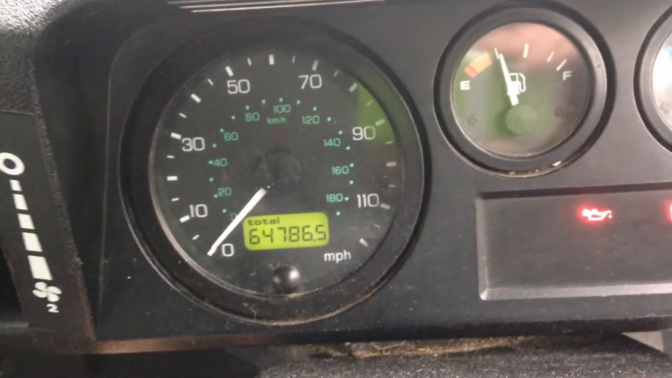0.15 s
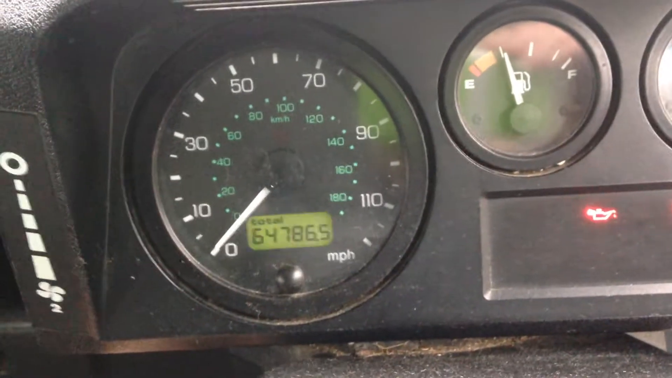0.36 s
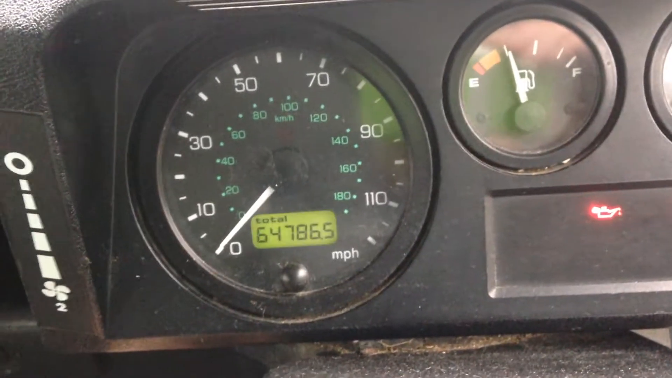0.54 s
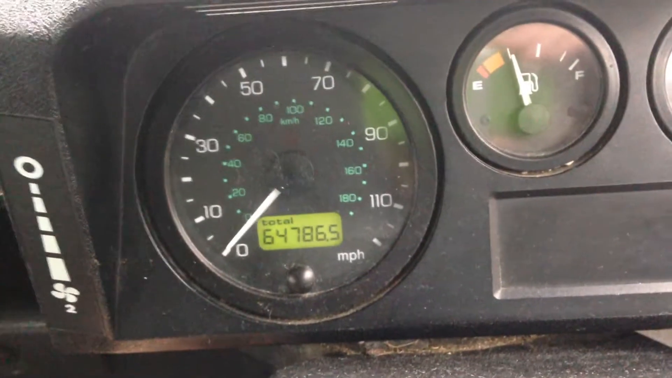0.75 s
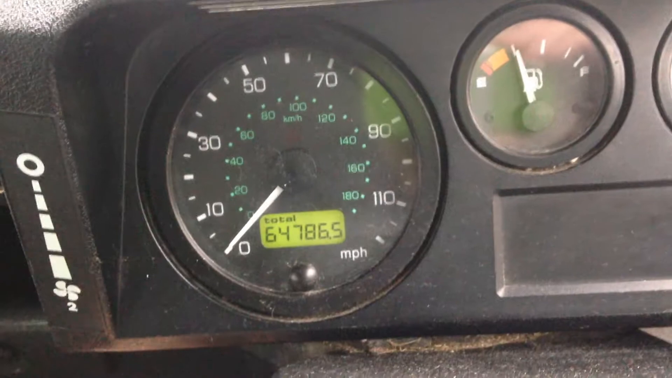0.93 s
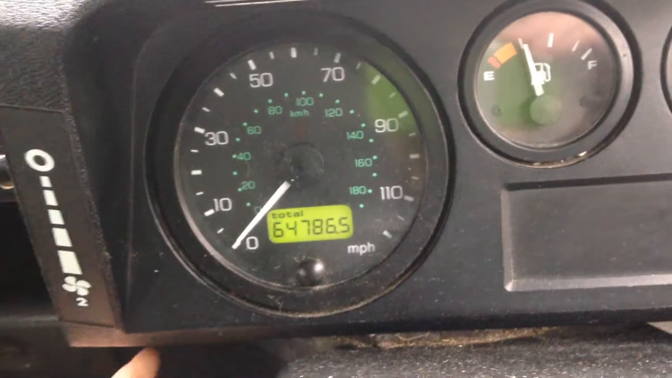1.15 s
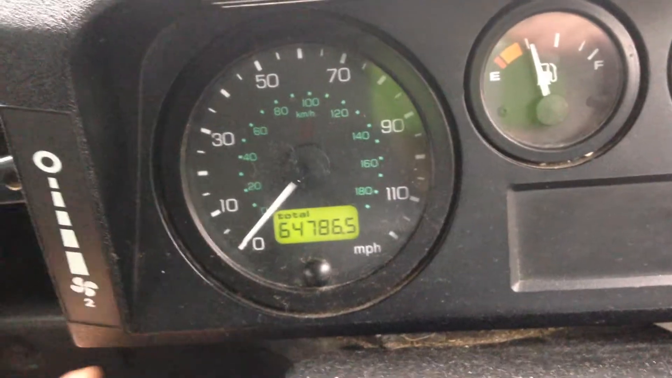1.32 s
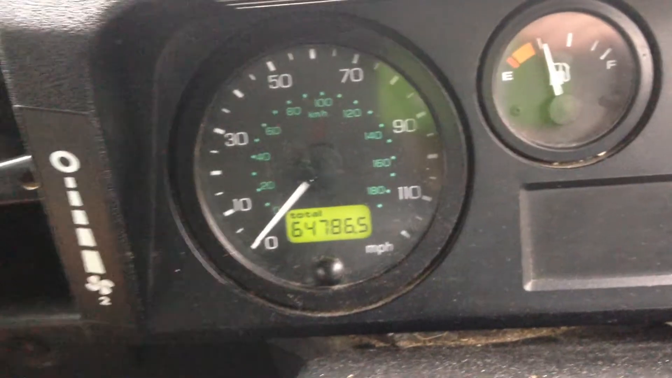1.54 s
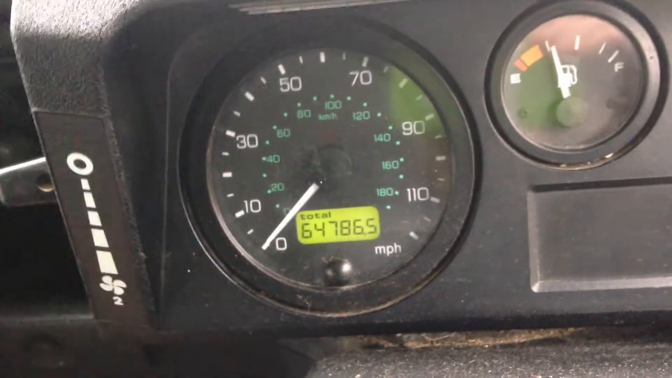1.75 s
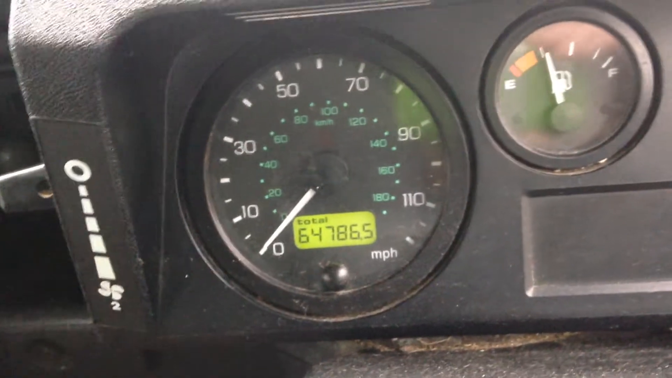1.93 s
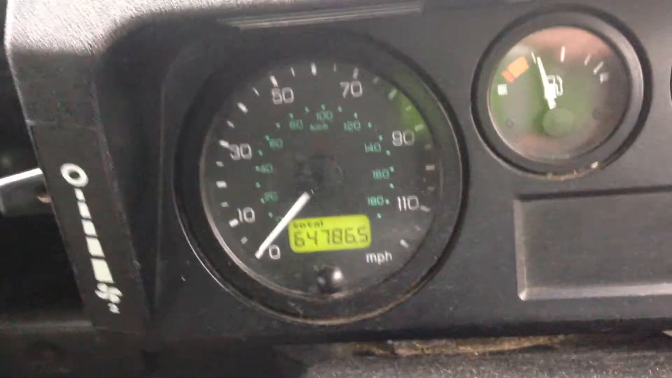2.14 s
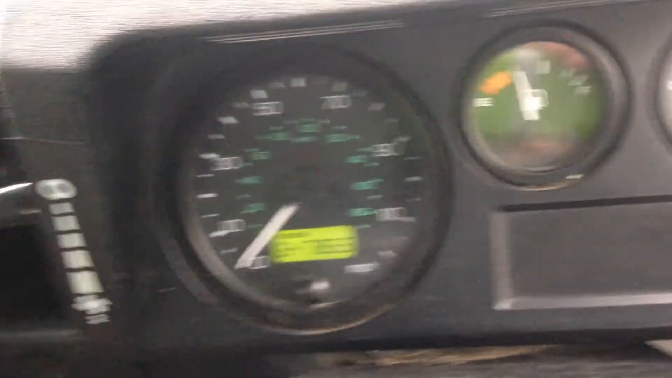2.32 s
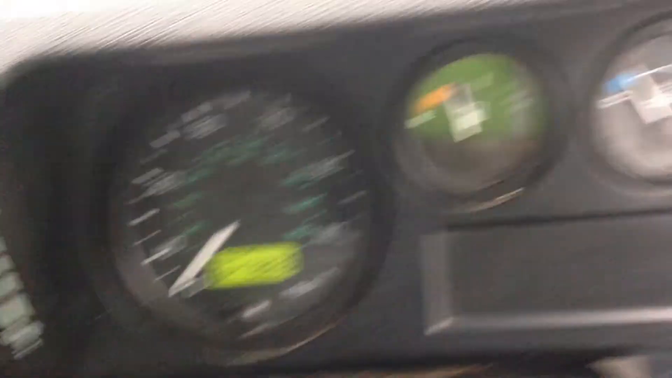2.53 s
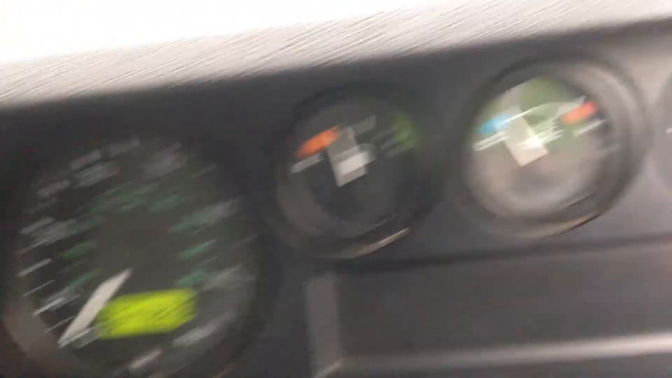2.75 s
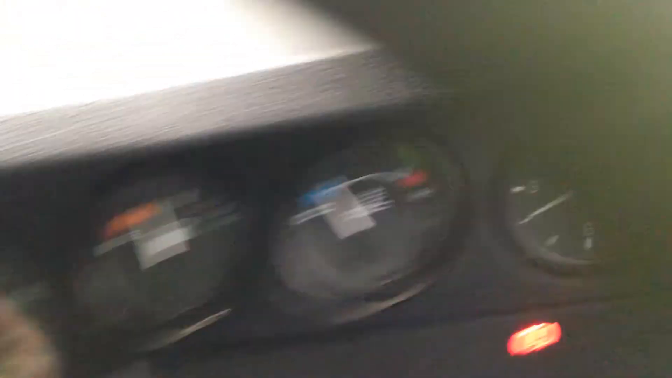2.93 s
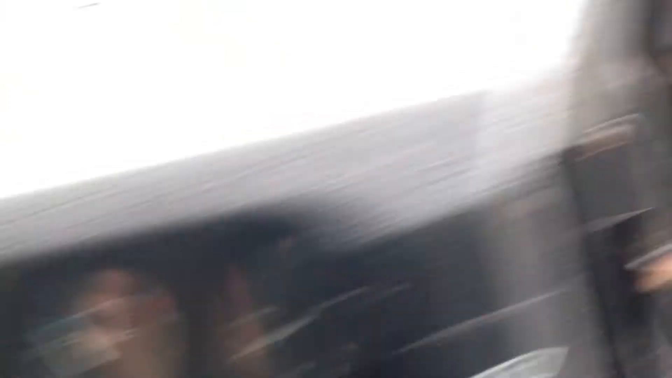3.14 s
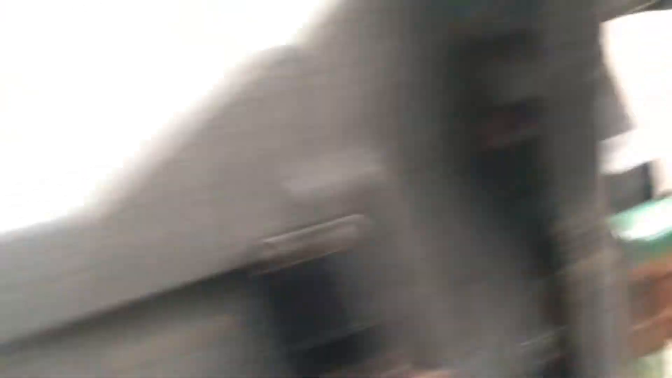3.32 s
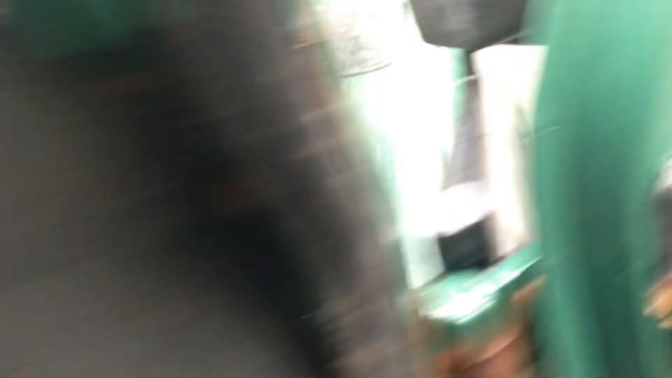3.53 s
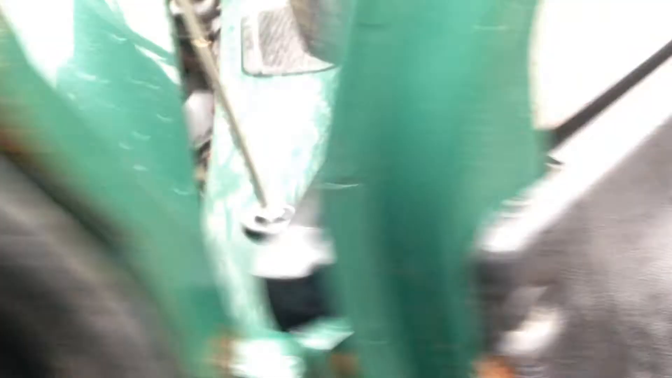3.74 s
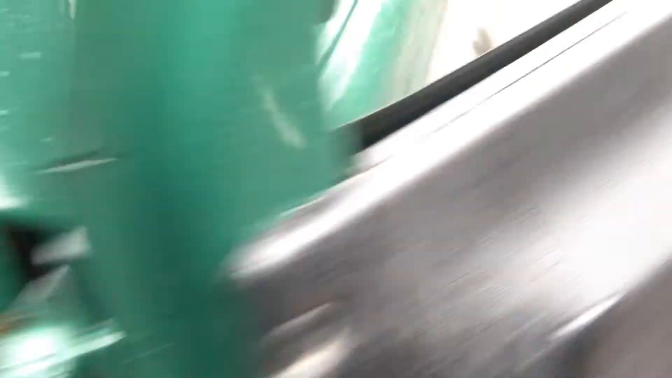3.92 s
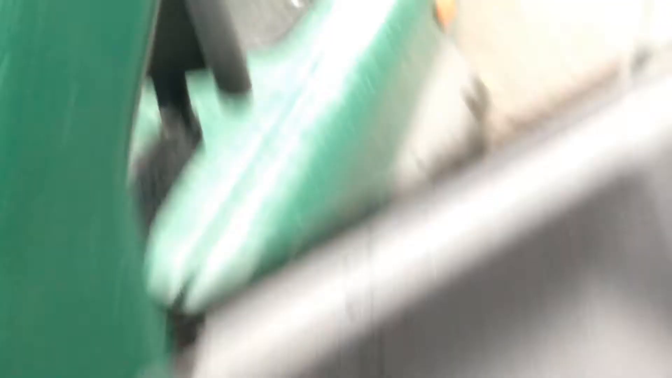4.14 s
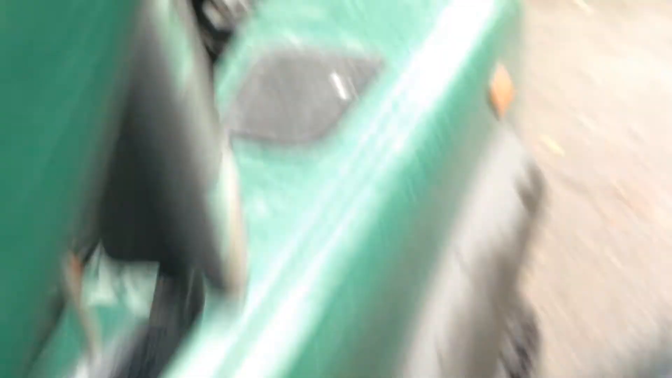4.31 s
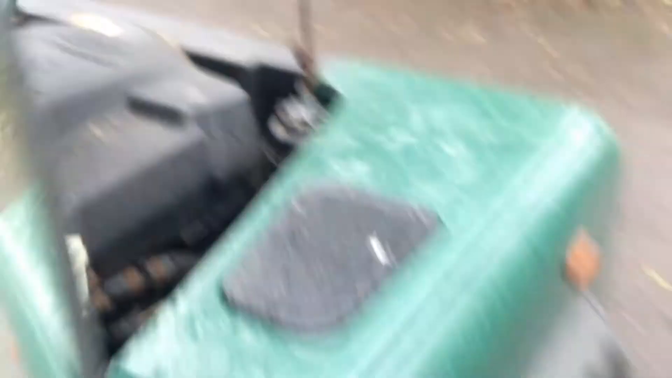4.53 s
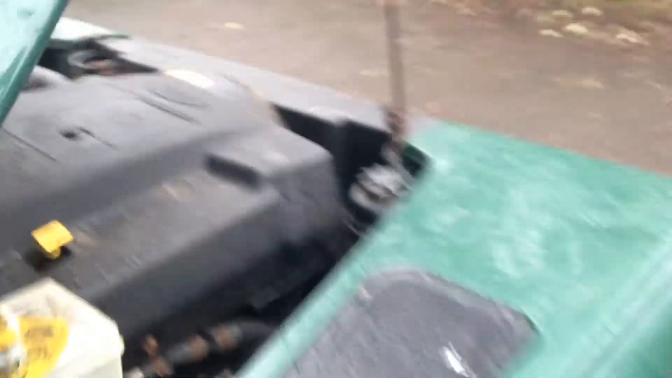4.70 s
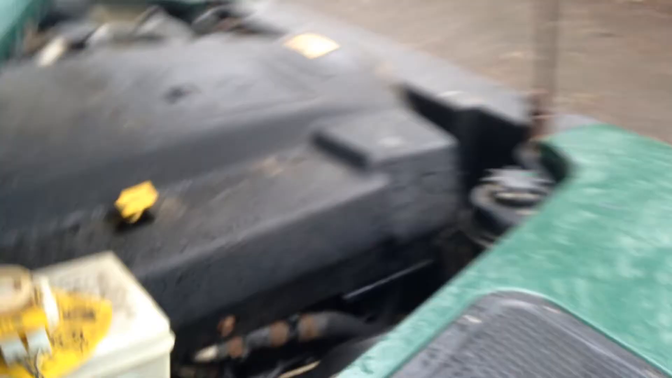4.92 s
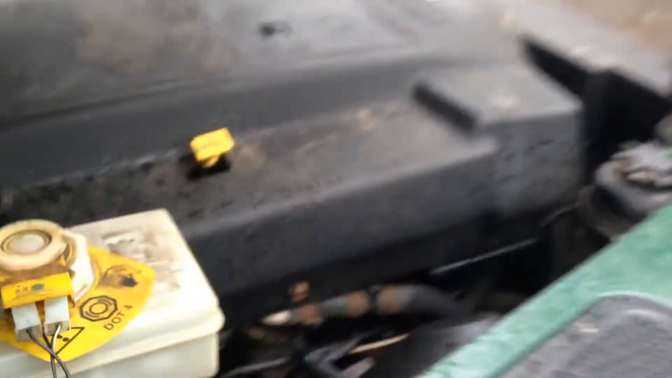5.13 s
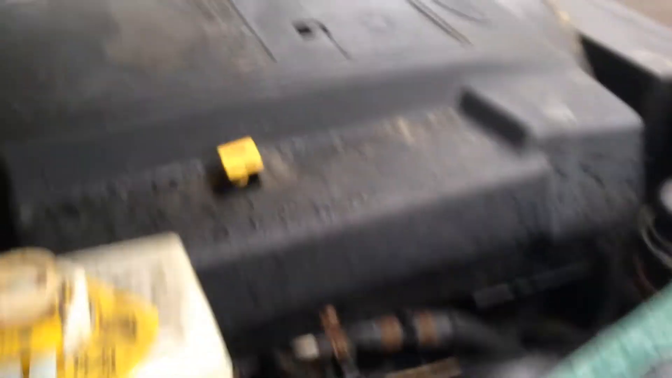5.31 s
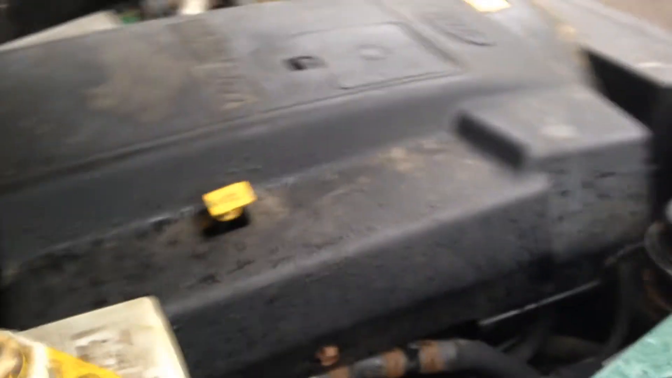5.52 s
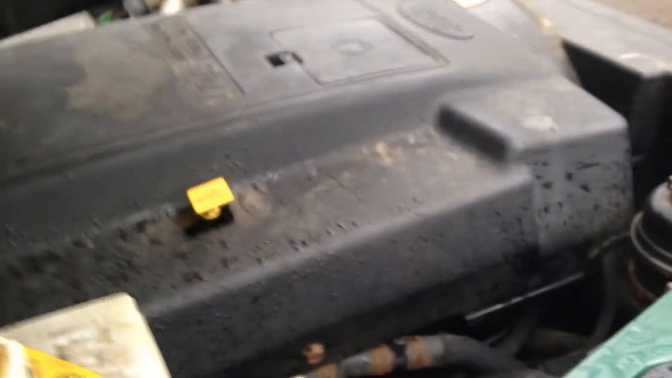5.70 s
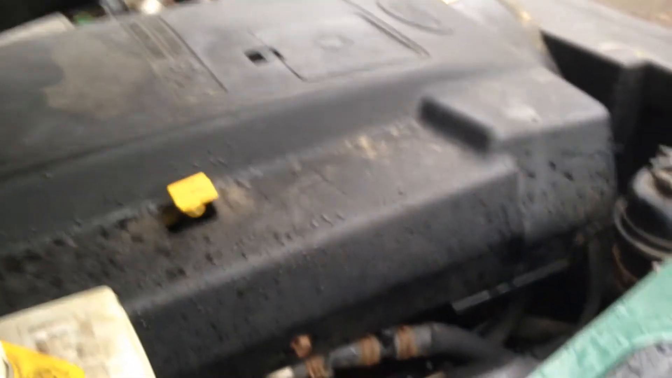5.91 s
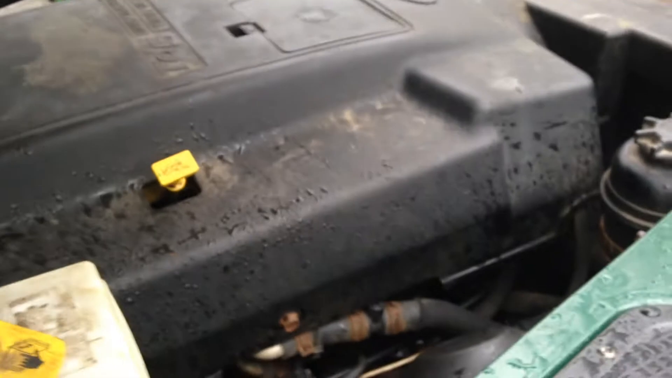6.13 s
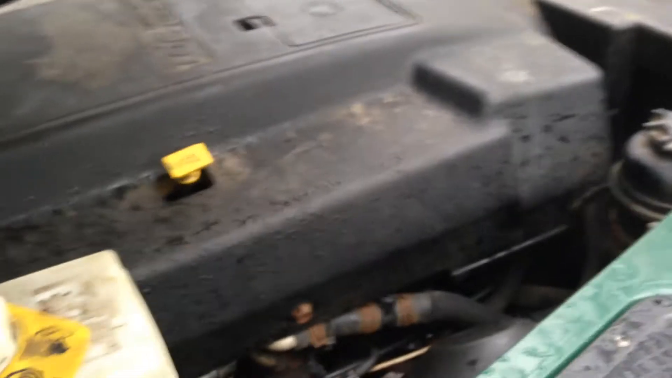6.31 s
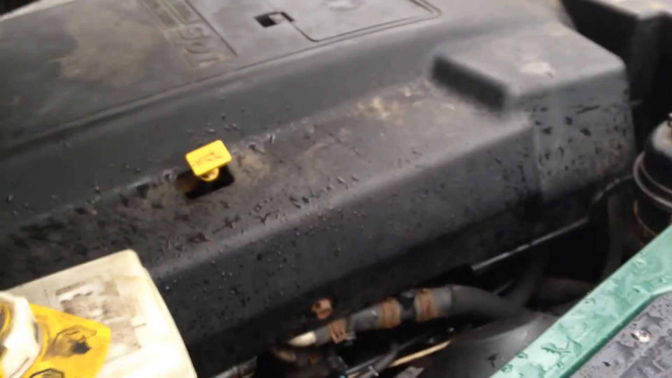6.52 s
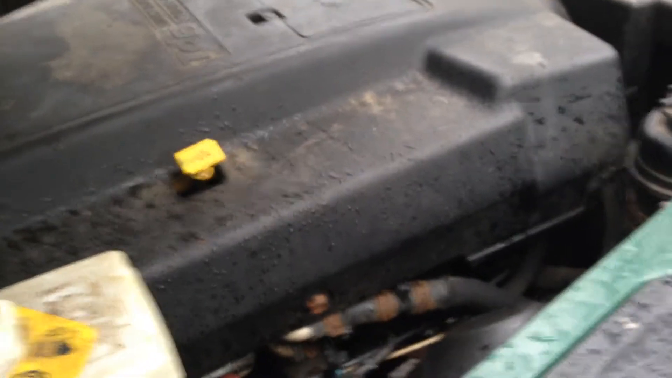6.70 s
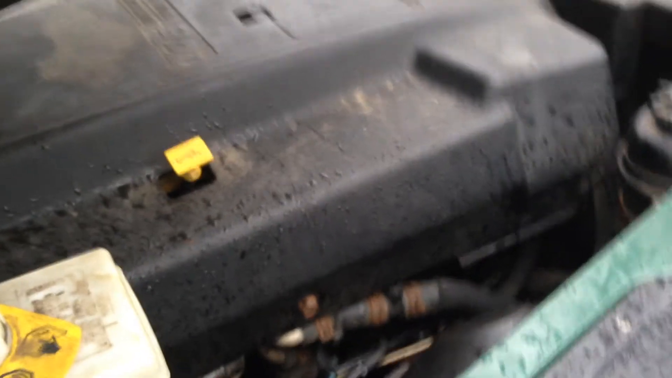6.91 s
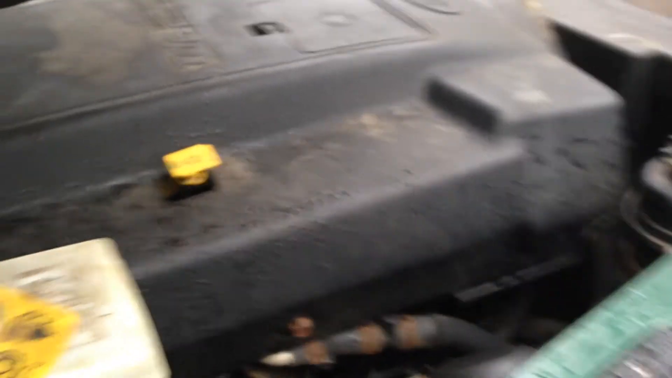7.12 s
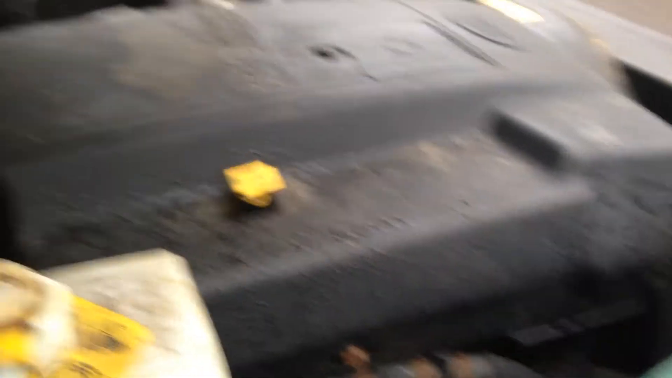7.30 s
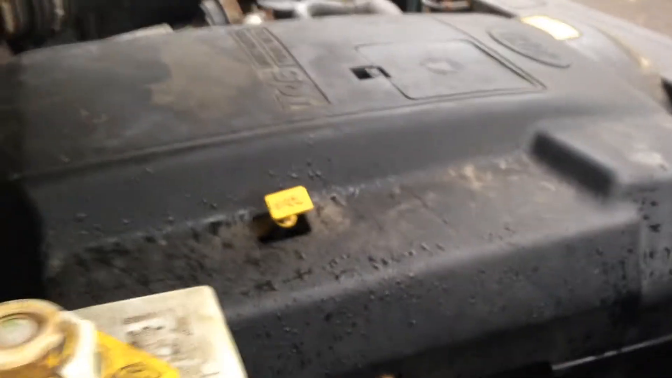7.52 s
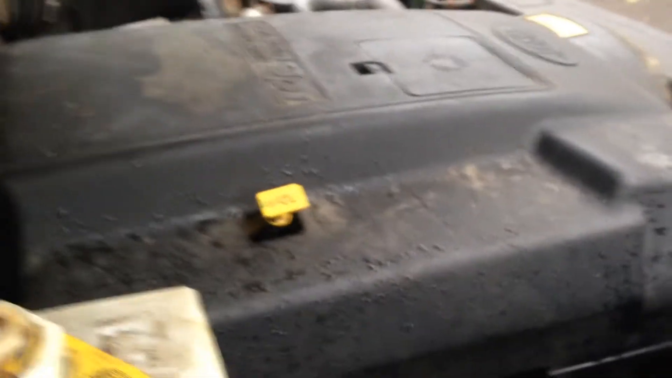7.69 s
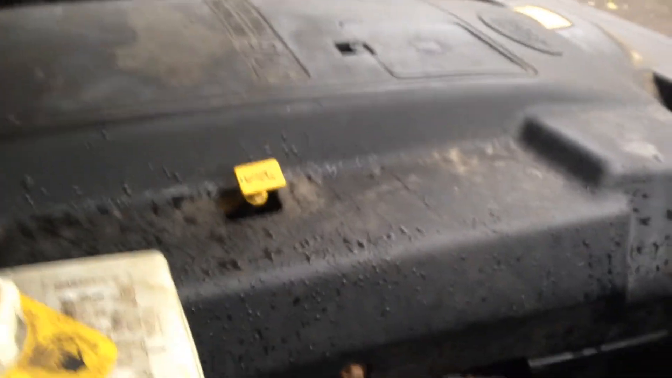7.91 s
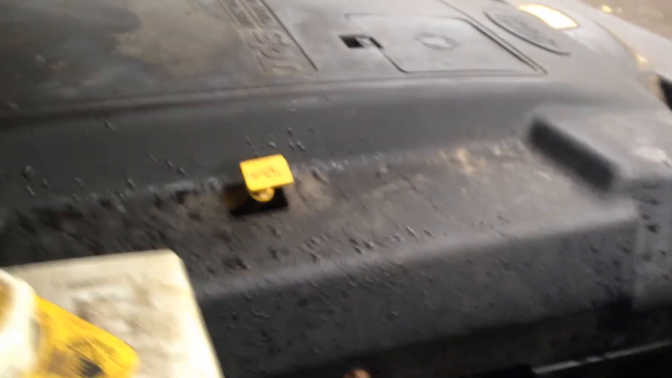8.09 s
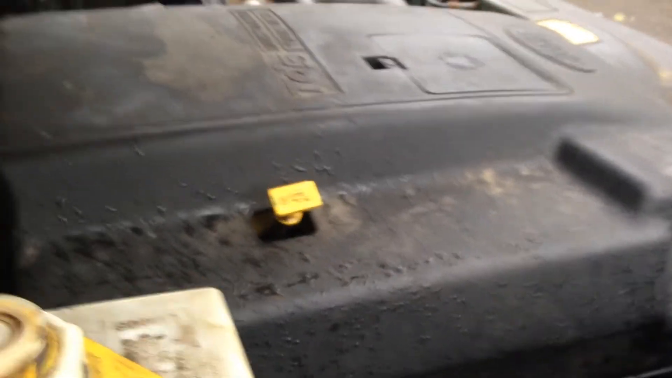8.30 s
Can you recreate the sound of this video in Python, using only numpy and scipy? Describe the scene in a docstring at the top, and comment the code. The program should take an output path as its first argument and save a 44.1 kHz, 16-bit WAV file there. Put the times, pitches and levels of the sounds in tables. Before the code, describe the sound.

Inside an old off-road vehicle, a thin bird twitter and faint pump hum precede a short grinding, whining starter. The diesel catches with a boom and metallic blows, then idles low and muffled while keys jingle. A door hinge groans as the handheld microphone moves outside, and the idle opens into close, uneven knocking, valve clatter and bright hiss over the engine bay.

```python
"""Five-cylinder diesel start

A small bird twitters, then a geared starter grinds and whines and a diesel catches and settles to a steady
idle. Keys jingle, the body takes blows, and a door hinge groans as the listener climbs out to the open bay.
Crank-locked orders make the boom; pulsed noise and struck modes make growl, knock, clatter and hiss.
Decaying sines and noise bursts make the metal; whistles, a pump hum, wind and traffic air fill the rest."""
import sys
import numpy as np
from scipy import signal
from scipy.fft import rfft, irfft, next_fast_len
from scipy.io import wavfile

SR = 44100
rng = np.random.default_rng(int(sys.argv[2]) if len(sys.argv) > 2 else 0)


def dump_mix(stems):
    """Bounce the given channels to the path in sys.argv[1] as a 16-bit WAV at rate SR."""
    frames = np.atleast_2d(stems).T  # one column per channel
    limited = np.clip(frames, -1, 1)  # hard clip at full scale
    pcm = np.round(limited * 32767).astype(np.int16)
    wavfile.write(sys.argv[1], SR, pcm)


N = 368235
T = np.arange(N) / SR


def amp(db):
    """Turn dB into linear gain."""
    return 10 ** (np.asarray(db) / 20)


def unit(x):
    """Scale to rms 1."""
    return x / np.sqrt(np.mean(x ** 2) + 1e-20)


def curves(rows):
    """Automation lanes: columns joined by straight lines in time."""
    time_s, *columns = np.transpose(rows)
    return [np.interp(T, time_s, column) for column in columns]


def noise(spectrum):
    """Steady noise of the given colour, rms 1."""
    hz, db = np.transpose(spectrum)
    size = next_fast_len(N)
    grid = np.maximum(np.fft.rfftfreq(size, 1 / SR), 1)
    gain = amp(np.interp(np.log(grid), np.log(hz), db, left=-90, right=-90))
    return unit(irfft(gain * rfft(rng.standard_normal(size)))[:N])


def resonate(x, hz, width_hz):
    """Two-pole resonance, gain 1 on top."""
    r = np.exp(-np.pi * width_hz / SR)
    feedback = [1, -2 * r * np.cos(2 * np.pi * hz / SR), r * r]
    return signal.lfilter([(1 - r * r) / 2, 0, (r * r - 1) / 2], feedback, x + 1e-18)


def wander(hz, width_hz):
    """Narrow-band random modulation, rms 1."""
    return unit(resonate(rng.standard_normal(N), hz, width_hz))


def decay(start_s, t60):
    """Sudden start and exponential fall, cut off after two decay times."""
    fall = amp(-60 * np.clip(T - start_s, 0, 2 * t60) / t60)
    return (T >= start_s) * fall * (T < start_s + 2 * t60)


def ring(start_s, hz, t60):
    """A sine struck at start_s, dying away."""
    return decay(start_s, t60) * np.sin(2 * np.pi * hz * (T - start_s))


def heard(cab, bay, outside):
    """Equal-power fade from noise of the cab's colour to noise of the open bay's."""
    return np.sqrt(1 - outside) * noise(cab) + np.sqrt(outside) * noise(bay)


def swells(rows):
    """Gain of separate swells, each rising to its top and falling in straight dB lines."""
    return sum(amp(db - np.where(T < top_s, rise * (top_s - T), fall * (T - top_s)))
               for top_s, db, rise, fall in rows)


# share of the engine heard in the open: (time [s], share [0-1])
OUTSIDE_SHARE = [(2.8, 0), (3.3, 0.2), (4.2, 0.34), (4.8, 0.71)]
# cab to bay: (time [s], boom level [dB], screening of the middle, of the treble [1 in cab, 0 over bay])
LISTENER_PATH = [(.9, -24, 1, 0.98), (1.04, -31, 0.91, 0.75), (1.22, -32.5, 1, 0.97),
                 (1.31, -40.5, .9, 0.98), (1.38, -32.5, 0.93, 0.98), (2.1, -34.5, 0.98, 1),
                 (2.8, -35, 0.98, 0.95), (3.14, -36.5, 0.73, 0.8), (3.5, -38, 0.53, 0.69),
                 (3.75, -40.5, 0.46, 0.48), (3.9, -41, .5, 0.54), (4.1, -39, 0.43, 0.59),
                 (4.35, -40.5, 0.33, .47), (4.55, -40.5, 0.19, 0.25), (4.8, -40.5, -0.0037, 0.075),
                 (5.36, -41, 0.016, -0.032), (6.25, -40, -0.027, 0.0092), (7.6, -40, -0.023, -0.03),
                 (8.35, -37.5, -0.15, -0.043)]
# growl, knock, clatter, hiss: (level over the bay [dB], loss in the cab [dB], extra at the catch [dB])
LAYER_LEVELS = [(-34, 16.5, 22), (-32, 22, -6), (-27.5, 27.5, 22), (-27.5, 33.5, 5)]


def engine():
    """Crank-locked layers, balanced by how much of the cab screens the listener."""
    boom_db, middle, treble = curves(LISTENER_PATH)
    outside = np.clip(curves(OUTSIDE_SHARE)[0], 0, 1)
    count = crank()
    surge = np.exp(-np.maximum(T - .9, 0) / 0.051)   # the catch dies away
    growl_db, knock_db, clatter_db, hiss_db = [
        level_db - lost_db * screen + catch_db * surge
        for screen, (level_db, lost_db, catch_db) in zip([middle, middle, treble, treble], LAYER_LEVELS)]
    white = rng.standard_normal(N)   # shared by knock, covers and spray
    mix = amp(boom_db) * engine_boom(count, outside)
    mix = mix + amp(growl_db) * engine_growl(count, outside)
    mix = mix + amp(knock_db) * combustion_knock(count, outside, white)
    mix = mix + knock_rings(count, outside, knock_db)
    mix = mix + amp(clatter_db) * valve_clatter(count, outside, white)
    mix = mix + amp(hiss_db) * injector_hiss(count, outside, white)
    running = np.clip((T - .87) / 0.088, 0, 1)
    return running * mix


# idle speed in firings per second: a slow catch, then a fast idle that settles
CATCH_S, CATCH_RATE, SETTLED_S = .86, 25.54, 1.2
IDLE_RATE, COLD_EXTRA_RATE, SETTLE_S = 30.9436, 1.5126, 3.3096   # SETTLE_S is a time constant
FIRST_FIRING = 28   # count at the catch; multiples of five fall on the first cylinder


def crank():
    """Firings so far, the integral of the firing rate; whole numbers fall on the knock."""
    since = np.maximum(T - SETTLED_S, 0)
    catch = CATCH_RATE * np.clip(T - CATCH_S, 0, SETTLED_S - CATCH_S)
    cold = COLD_EXTRA_RATE * SETTLE_S * (1 - np.exp(-since / SETTLE_S))
    return FIRST_FIRING + catch + IDLE_RATE * since + cold


def chance():
    """One bounded random draw for each firing."""
    return np.clip(rng.standard_normal(300), -1.5, 1.5)


def pressure_jumps(count):
    """One-sample impulse as each firing's pressure jumps, and the index of the nearest firing."""
    jump = np.diff(np.floor(count + 0.0615), prepend=FIRST_FIRING)
    return jump, np.round(count).astype(int)


def strokes(count, start, rise, fall, depth_db, pattern_db, spread_db):
    """Gain over each firing: rounded rise, fall onto a floor; height set by cylinder and chance."""
    since = count - start
    firing, part = since.astype(int), since % 1
    height_db = np.asarray(pattern_db)[firing % 5] + spread_db * chance()[firing]
    shape = (1 - np.exp(-(part / rise) ** 2)) * np.exp(-(part / fall) ** 2)
    return unit(amp(-depth_db) + shape / shape.max() * amp(height_db))


# cylinders in firing order: (boom [dB], growl [dB], clatter [dB])
CYLINDER_LEVELS = [(1, -0.5, 1.5), (2.5, 5, 3), (1.5, -3, 2), (6, -2, 0.5), (5, -0.5, 2.1)]
BOOM_PATTERN, GROWL_PATTERN, CLATTER_PATTERN = np.transpose(CYLINDER_LEVELS)


def orders(table, low, high, count, pattern_db):
    """Harmonics of the firing rate; uneven cylinders add fifth orders."""
    swell = amp(np.interp(count % 5, range(6), [*pattern_db, pattern_db[0]]))
    lines = sum(amp(db) * np.cos(2 * np.pi * k * count + 0.1558 * k * k)
                for k, db in table if low <= k < high)
    return unit(swell * lines)


# exhaust orders in the cab: (multiple of firing rate, level [dB])
CAB_ORDER_LEVELS = [(1, -18), (2, -6), (3, -1.5), (4, 6), (5, -23), (6, -18.5)]
# exhaust orders over the engine: (multiple of firing rate, level [dB])
BAY_ORDER_LEVELS = [(1, -3), (2, -10.5), (3, -5.5), (4, 3.5), (5, 4.5), (6, -26), (7, 4.5), (8, -29.5),
                    (9, -3), (10, -11), (11, -10.5), (12, 4.5), (13, 0), (14, -4), (15, 0.5), (16, -9),
                    (17, 2.5), (18, -15)]
# fifth orders that the cab brings out: (multiple of firing rate, level [dB])
CAB_FIFTH_LEVELS = [(1.4, -22), (1.8, -18), (2.6, -9), (3.6, -13), (4.4, -13)]
# fifth orders that the bay brings out: (multiple of firing rate, level [dB])
BAY_FIFTH_LEVELS = [(2.6, -14), (3.6, -13), (4.4, -6), (4.6, -8), (5.2, -12)]
# boom noise in the cab, also under the starter: (frequency [Hz], density [dB per Hz])
CAB_BOOM_COLOUR = [(12, -60), (20, -16), (124, 4.5), (141, 1.5), (157, -6), (193, -2.5), (217, -10),
                   (260, -17), (340, -38), (570, -120)]
# noise between the orders, over the engine: (frequency [Hz], density [dB per Hz])
BAY_BOOM_COLOUR = [(12, -41), (20, -11), (70, -2), (129, 2), (150, 10), (188, -34), (221, 0), (260, -12),
                   (340, -40), (570, -120)]


def engine_boom(count, outside):
    """Low exhaust orders repeat with the crank over a bed of low noise."""
    cab = orders([*CAB_ORDER_LEVELS, *CAB_FIFTH_LEVELS], 1, 7, count, BOOM_PATTERN)
    bay = orders([*BAY_ORDER_LEVELS, *BAY_FIFTH_LEVELS], 1, 7, count, BOOM_PATTERN)
    lines = (1 - outside) * cab + outside * bay
    bed = heard(CAB_BOOM_COLOUR, BAY_BOOM_COLOUR, outside)
    return unit(lines + amp(-5 - 1.5 * outside) * bed)


# growl in the cab: (frequency [Hz], density [dB per Hz])
CAB_GROWL_COLOUR = [(110, -45), (190, -7), (226, -12), (254, -7), (327, -11), (421, -10), (546, -12.5),
                    (573, -28), (650, -11), (956, -18.5), (1250, -16.5), (1620, -51), (2750, -120)]
# growl over the engine: (frequency [Hz], density [dB per Hz])
BAY_GROWL_COLOUR = [(110, -39), (190, -26.5), (211, -3), (330, -3), (399, -0.5), (655, -5), (1040, -4.5),
                    (1250, -5), (1620, -1), (2750, -120)]
# low panels thumped by each firing: (frequency [Hz], width [Hz], level [dB])
SUMP_MODES = [(399.5, 20, 8), (483, 40, -2.5), (253, 67, -2.5)]


def engine_growl(count, outside):
    """Noise pulsed by each firing, joined in the open by higher orders and thumped low panels."""
    pulsed = heard(CAB_GROWL_COLOUR, BAY_GROWL_COLOUR, outside)
    pulsed = pulsed * strokes(count, -0.24, .12, 0.65, -3 + 9 * outside, GROWL_PATTERN, 0.51)
    jump, firing = pressure_jumps(count)
    thump = 0
    for hz, width_hz, db in SUMP_MODES:
        hit = jump * amp(2 * GROWL_PATTERN[firing % 5] + chance()[firing])
        thump = thump + amp(db) * resonate(hit, hz, width_hz)
    thump = unit(resonate(unit(thump), 336, 530))   # a soft contact has no crack
    upper = orders(BAY_ORDER_LEVELS, 7, 19, count, GROWL_PATTERN)
    return unit(pulsed + outside * (amp(-4.5) * upper + amp(-8) * thump))


# knock strength in firing order: level [dB]
KNOCK_PATTERN = np.array([0, -2, -3.5, -6, -8])
# engine block under the knock: (frequency [Hz], width [Hz], level [dB])
BLOCK_MODES = [(1213, 250, -8.5), (1403, 48, -6.5), (1498, 42, -4.5), (1547, 82, -2), (1661, 52, -5.5),
               (1802, 160, -14.5)]


def combustion_knock(count, outside, white):
    """The pressure jump is a sharp click in a short burst; each block mode answers in its own strength."""
    jump, firing = pressure_jumps(count)
    click = np.sqrt(SR / 31) * jump * amp(KNOCK_PATTERN[firing % 5])
    knock = 0
    for k, (hz, width_hz, db) in enumerate(BLOCK_MODES):
        burst = white * strokes(count, -.27, .14, .3, 10 + 5 * outside, KNOCK_PATTERN * 1.3, 1.2)
        uneven_click = click * amp(2.5 * chance())[firing]
        mode = unit(resonate(burst + amp(-6) * outside * uneven_click, hz, width_hz))
        knock = knock + (-1) ** k * amp(db) * mode   # neighbouring modes in opposite phase
    return unit(resonate(knock, 1515, 1000))   # the block radiates little outside this band


# the note each cylinder's knock rings, in firing order: (doorway frequency [Hz], bay frequency [Hz],
# lead [firings], level over the knock in the cab [dB], from the doorway [dB], over the bay [dB])
KNOCK_NOTES = [(1620, 1600, .17, 15, 15, 18), (1420, 1560, .08, 14, 19, 14), (1600, 1560, .15, 12, 15, 14),
               (1550, 1545, .12, -5, 3, 10), (1500, 1420, .12, -5, 3, 8)]
# the hardest firings: (time [s], extra level [dB])
HARD_FIRINGS = [(3.17, 13), (4.751, 7), (4.817, 9), (4.945, 6), (5.006, 10), (5.103, 2), (5.421, 9),
                (6.286, 7)]
RING_T60_S, RING_RISE_S = .027, .002
RING_SPREAD_DB, RING_SPREAD_HZ = 1.5, 28
CAB_RING_HZ = 1630   # the bulkhead passes one note only


def knock_rings(count, outside, knock_db):
    """Once a cycle each cylinder strikes a note, a little different every time; a few strike harder."""
    total = np.zeros(N)
    for cylinder, (door_hz, bay_hz, lead, cab_db, door_db, bay_db) in enumerate(KNOCK_NOTES):
        draws = rng.standard_normal((60, 2))
        struck = np.flatnonzero(np.diff(np.floor((count + lead - cylinder) / 5)))
        for i, (level_draw, pitch_draw) in zip(struck, draws):
            place_db = np.interp(outside[i], [0, .05, .36, .46], [cab_db, door_db, door_db, bay_db])
            top_db = knock_db[i] + place_db + RING_SPREAD_DB * level_draw
            top_db += sum(extra_db for hard_s, extra_db in HARD_FIRINGS if abs(hard_s - T[i]) < .012)
            hz = np.interp(outside[i], [.03, .06, .40, .44], [CAB_RING_HZ, door_hz, door_hz, bay_hz])
            hz += RING_SPREAD_HZ * pitch_draw
            t = T[:min(int(2 * RING_T60_S * SR), N - i)]
            envelope = amp(top_db - 60 * t / RING_T60_S) * (1 - np.exp(-t / RING_RISE_S))
            total[i:i + len(t)] += envelope * np.sin(2 * np.pi * hz * t)
    return total


# clatter in the cab: (frequency [Hz], density [dB per Hz])
CAB_CLATTER_COLOUR = [(1060, -38), (1800, 4), (2070, -5.5), (2430, -1.5), (2650, -7.5), (3600, -6),
                      (4230, -17.5), (4590, -39), (6200, -22), (8060, -63), (13600, -120)]
# clatter over the engine: (frequency [Hz], density [dB per Hz])
BAY_CLATTER_COLOUR = [(1060, -54), (1800, -4.5), (2270, -1.5), (2530, -1), (2840, 4.5), (3750, -2.5),
                      (4380, -4.5), (4890, -1), (5500, -10.5), (6200, -5.5), (8060, -17), (13600, -120)]
# valve gear and covers: (frequency [Hz], width [Hz], level [dB])
COVER_MODES = [(2099, 21, 2), (2593, 34, 3.5), (2798, 65, 4), (3090, 130, 2), (4338, 45, -0.5),
               (4630, 830, 9.5)]


def valve_clatter(count, outside, white):
    """Pulsed rattle noise; each cover resonates with its own strength at every firing."""
    rattle = heard(CAB_CLATTER_COLOUR, BAY_CLATTER_COLOUR, outside)
    rattle = rattle * strokes(count, -0.45, 0.36, 0.52, -9 + 15 * outside, CLATTER_PATTERN, 2.7)
    clanks = 0
    for hz, width_hz, db in COVER_MODES:
        burst = white * strokes(count, -0.44, .22, 0.54, -6 + 18 * outside, CLATTER_PATTERN, 5.3)
        clanks = clanks + amp(db) * unit(resonate(burst, hz, width_hz))
    return unit(rattle + amp(-2.0) * unit(clanks))


# injector hiss: (frequency [Hz], density [dB per Hz])
HISS_COLOUR = [(3410, -8), (5800, -4.5), (7030, 1), (10700, -3), (11800, -1.5), (12400, -10.5), (14900, 3),
               (15500, -4), (15800, -18)]


def injector_hiss(count, outside, white):
    """Pulsed bright noise with a narrower spray band; injection leads the knock."""
    hiss = noise(HISS_COLOUR)
    hiss = hiss * strokes(count, -0.57, 0.19, 0.6, -9 + 16 * outside, CLATTER_PATTERN, 3.8)
    spray = white * strokes(count, -0.37, 0.45, 0.33, -3 + 16 * outside, CLATTER_PATTERN, 2.3)
    spray = resonate(spray, 12170, 750)
    return unit(hiss + amp(-4.0) * unit(spray))


# starter gears: (time [s], pinion mesh [Hz], pinion level [dB], reduction gear [Hz], its level [dB])
GEAR_MESH = [(.42, 1066, -42, 760, -70), (.46, 948, -52, 760, -63), (.49, 975, -43, 772, -50),
             (.54, 1100, -44, 768, -65), (.58, 1154, -50, 766, -49), (.62, 1152, -46, 783, -40),
             (.66, 1077, -44, 717, -42), (.71, 1044, -51, 740, -55)]


def gear_mesh(hz, db, harmonics):
    """Meshing teeth: harmonics of the tooth rate, with uneven teeth and a stuttering load."""
    turns = np.cumsum(hz + 55 * wander(30, 200)) / SR
    stutter_db = 4 * wander(28, 43)   # the load comes and goes
    return amp(db + stutter_db) * sum(amp(g) * np.sin(2 * np.pi * k * turns) for k, g in harmonics)


# starter motor: (time [s], grinding level [dB], boom level [dB], hiss level [dB])
STARTER_LEVELS = [(0.418, -36.5, -45, -38.5), (0.456, -38.5, -28, -48), (0.546, -43, -42.5, -53.5),
                  (0.614, -42.5, -36, -45.5), (0.658, -36.5, -52, -49), (0.728, -45.5, -31.5, -58),
                  (0.76, -55, -44, -46.5), (0.838, -44, -30.5, -54), (0.864, -40, -33, -39),
                  (0.95, -56.5, -7, -42.5)]
# grinding, and the noise of the blows: (frequency [Hz], density [dB per Hz])
CRASH_COLOUR = [(180, -40), (300, -0.5), (548, -7), (818, -4), (1250, -3.5), (1870, -4), (2500, -3),
                (2760, -7), (4220, -10.5), (6000, -32), (7800, -21), (13200, -120)]
# treble of starter and blows: (frequency [Hz], density [dB per Hz])
CRASH_TREBLE = [(2940, -24), (5000, -2), (5200, -2.5), (5610, -6), (6940, -6.5), (12800, -15), (14800, -14),
                (15800, -28)]
# bell housing and starter case, also rung by the blows: (frequency [Hz], width [Hz], level [dB])
CASE_MODES = [(750, 140, 1), (1094, 55, 1), (1650, 39, -2), (1946, 79, -0.5), (2465, 37, -4), (3060, 49, 1),
              (3710, 110, 5.5), (4170, 90, 5.5), (4700, 90, 3), (5570, 64, -3)]


def case_rings(x):
    """The metal cases answer a noise, one resonance for each mode."""
    return sum(amp(db) * resonate(x, hz, width_hz) for hz, width_hz, db in CASE_MODES)


def starter():
    """Two gear meshes whine over grinding noise while the cab shakes."""
    grind_db, boom_db, hiss_db = curves(STARTER_LEVELS)
    pinion_hz, pinion_db, gear_hz, gear_db = curves(GEAR_MESH)
    whine = gear_mesh(pinion_hz, pinion_db, [(1, 3.0), (2, 3.5), (3, -7), (4, -23)])
    whine = whine + gear_mesh(gear_hz, gear_db, [(1, -7.0), (2, 3.5)])
    squeak = amp(-45.0) * wander(4700, 50) * np.exp(-((T - .6) / 0.043) ** 2)
    grind = noise(CRASH_COLOUR)
    grind = unit(grind + amp(-2.0) * case_rings(grind))
    mix = whine * (T < .71) + squeak + amp(grind_db) * grind
    mix = mix + amp(boom_db) * noise(CAB_BOOM_COLOUR) + amp(hiss_db) * noise(CRASH_TREBLE)
    on = (T > .415) * np.clip((.95 - T) / 0.13, 0, 1)
    return on * mix


# blows through the body, burst and thump scaled again in the mix: (time [s], burst [dB], t60 [s],
# thump [dB], treble over burst [dB], strongest region [Hz])
BODY_BLOWS = [(0.371, -50, 0.15, -62, 7, 4930), (0.391, -45, 0.079, -52, -3, 2100),
              (0.411, -38.5, .4, -45, -13, 1090), (0.752, -30.5, 0.2, -47, -19, 1890),
              (0.855, -32, 0.37, -33, -2.5, 2500), (1.042, -38.5, 0.28, -39, -2, 1610),
              (1.07, -36.5, 0.066, -53, -10, 1095), (3.168, -43, 0.19, -53, -20, 1500)]
# body modes under each thump: (frequency [Hz], level [dB], t60 [s])
BODY_MODES = [(86.4, 10.5, 0.46), (127, -17, 0.17), (186, 6.5, 0.24), (257, -1, .15)]


def blows():
    """A burst of noise that rings the metal, and a thump in the body modes, for each blow."""
    crash, bright = noise(CRASH_COLOUR), noise(CRASH_TREBLE)
    burst, out = 0, 0
    for start_s, db, t60, thump_db, bright_db, hz in BODY_BLOWS:
        fall = amp(db) * decay(start_s, t60)
        burst = burst + 0.57 * fall * crash + 1.4 * resonate(fall * crash, hz, 640)
        out = out + fall * amp(bright_db) * bright
        thump = sum(amp(g) * ring(start_s + 0.0053, mode_hz, d) for mode_hz, g, d in BODY_MODES)
        out = out + amp(thump_db) * thump
    return out + .5 * burst + amp(6.0) * case_rings(burst)


# dull knock on a panel: (time [s], level [dB], low mode [Hz], high mode [Hz], t60 [s])
PANEL_KNOCKS = [(3.897, -15.5, 374, 527, 0.032)]


def panel_knocks():
    """Two short-lived panel modes through one broad resonance between them."""
    out = 0
    for start_s, db, low_hz, high_hz, t60 in PANEL_KNOCKS:
        modes = ring(start_s, low_hz, t60) + 0.42 * ring(start_s, high_hz, t60)
        out = out + amp(db) * resonate(modes, (low_hz + high_hz) / 2, 570)
    return out


# keys touching: (time [s], tick [dB], low mode [dB], middle mode [dB], high mode [dB])
KEY_TOUCHES = [(0.3099, -59, -56, -62, -68), (1.042, -45, -50, -47, -38), (1.073, -42, -35, -43, -24),
               (1.1074, -39, -34, -38, -38), (1.1947, -44, -38, -48, -40), (1.387, -41, -49, -41, -37),
               (1.508, -54, -53, -60, -48), (2.2098, -47, -50, -40, -39), (2.3441, -51, -55, -49, -48),
               (2.6676, -51, -46, -58, -41), (3.0036, -43, -41, -49, -37)]
# key modes, low to high: (frequency [Hz], t60 [s])
KEY_RINGING = [(6874, 0.076), (10000, 0.16), (13600, 0.08)]


def keys():
    """A tick and three ringing modes for each touch; a second key beats against each mode."""
    tick, out = noise([(5500, -10), (8000, -3), (15500, 0)]), 0
    for start_s, tick_db, *mode_db in KEY_TOUCHES:
        out = out + amp(tick_db) * decay(start_s, .03) * tick
        for db, (hz, t60) in zip(mode_db, KEY_RINGING):
            second_key = 0.25 * ring(start_s, 1.02 * hz, 0.32 * t60)
            out = out + amp(db) * (ring(start_s, hz, t60) + second_key)
    return out


def waver(hz, spread_hz):
    """A sine whose pitch wanders at random."""
    return np.sin(2 * np.pi * np.cumsum(hz + spread_hz * wander(15, 60)) / SR)


# door hinge: (time [s], frequency [Hz], level [dB])
HINGE_GROAN = [(3.3, 338, -53), (3.45, 370, -51), (3.62, 355, -39.5), (3.7, 442, -47), (3.75, 630, -36),
               (3.82, 665, -51), (3.9, 666, -65)]


def hinge_groan():
    """The door hinge groans on one gliding, wavering tone."""
    hz, db = curves(HINGE_GROAN)
    return amp(db) * waver(hz, 31.0) * (T > 3.3) * (T < 3.9)


# bright swishes, perhaps cloth on the seat: (time of top [s], level [dB], rise [dB/s], fall [dB/s])
SWISH_SWELLS = [(2.5, -50.5, 250, 400), (2.99, -44, 150, 350)]


def swishes():
    """Bright noise in quick swells."""
    return swells(SWISH_SWELLS) * noise([(2500, -21), (4000, 4), (9000, -1), (15500, -3)])


# notes of the bird: (start [s], length [s], first [Hz], middle [Hz], last pitch [Hz], level [dB])
BIRD_NOTES = [(0, 0.046, 7700, 7600, 7750, -66), (.06, 0.17, 8100, 8700, 8600, -64),
              (0.197, .12, 8500, 8400, 8500, -69), (.33, .04, 8350, 8300, 8200, -68)]


def bird():
    """A thin, fast-warbling whistle; each note swells and fades."""
    warble = 120 * np.sin(2 * np.pi * 90 * T) + 130 * wander(90, 200)   # Hz
    out = 0
    for start_s, length_s, *hz, db in BIRD_NOTES:
        part = np.clip((T - start_s) / length_s, 0, 1)
        pitch = np.interp(part, [0, .5, 1], hz) + warble
        swell = np.sqrt(2 * np.sin(np.pi * part) + 1e-12)
        out = out + amp(db) * swell * np.sin(2 * np.pi * np.cumsum(pitch) / SR)
    return out


# wind on the microphone: (time of top [s], level [dB], rise [dB/s], fall [dB/s])
WIND_GUSTS = [(7.78, -40, 60, 10), (8.04, -35, 70, 68), (8.25, -38, 150, 135.5)]


def wind():
    """Low noise swelling as wind buffets the microphone."""
    return swells(WIND_GUSTS) * noise([(60, -20), (100, -8), (135, 1.0), (180, -10.5), (250, -14)])


# electric pump with the ignition on: (frequency [Hz], level [dB])
PUMP_TONES = [(131, -75), (597, -62)]


def pump_hum():
    """Steady electric tones that waver a little in pitch."""
    return sum(amp(db) * waver(hz, 8.7) for hz, db in PUMP_TONES)


# distant traffic: (frequency [Hz], density [dB per Hz])
TRAFFIC_COLOUR = [(20, -40), (130, 5), (165, -8), (450, -5), (560, -18), (680, -6.5), (1350, -8.5),
                  (3000, -18.5), (7000, -32), (9500, -35), (12000, -39), (15800, -40)]


def traffic_air():
    """Distant traffic as one steady bed of noise."""
    return amp(-53) * noise(TRAFFIC_COLOUR)


def scene():
    """All sources at one microphone."""
    foreground = engine() + starter() + blows() + panel_knocks() + keys()
    details = hinge_groan() + swishes() + bird()
    background = wind() + pump_hum() + traffic_air()
    return (foreground + details + background)[None]


def record(dry):
    """The microphone drops the deepest bass; the top is cut."""
    low_cut = signal.butter(2, 15, "high", fs=SR, output="sos")
    top_cut = signal.cheby2(14, 70, 15750, fs=SR, output="sos")   # 70 dB down from 15750 Hz
    return signal.sosfilt(top_cut, signal.sosfilt(low_cut, dry))


dry = scene()
out = record(dry)
dump_mix(out)
```